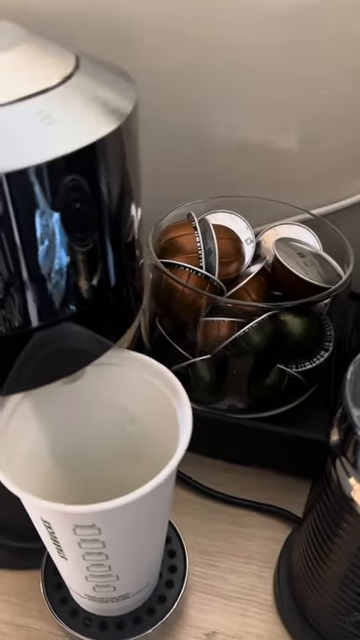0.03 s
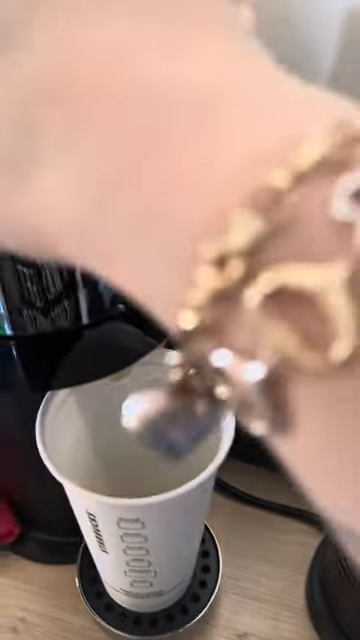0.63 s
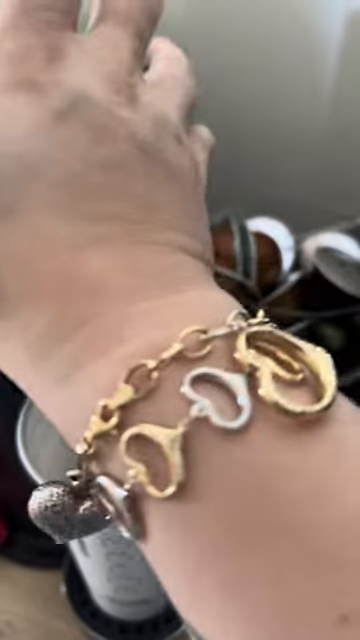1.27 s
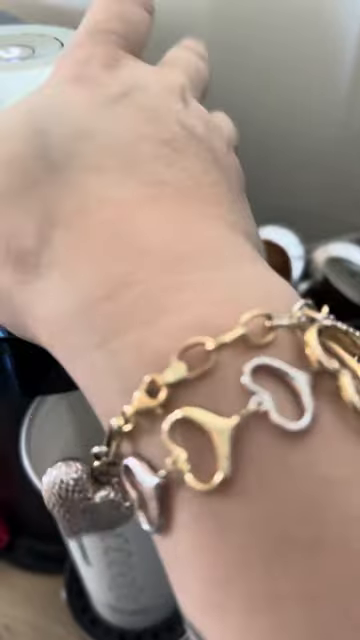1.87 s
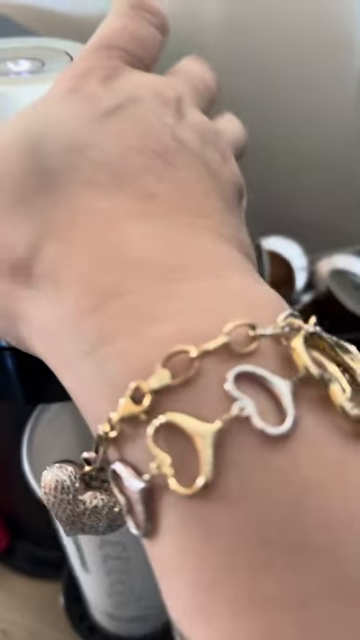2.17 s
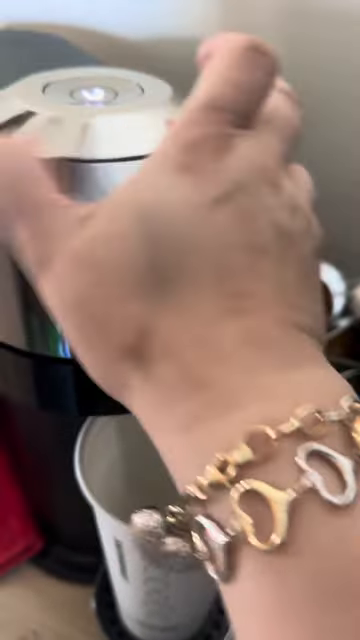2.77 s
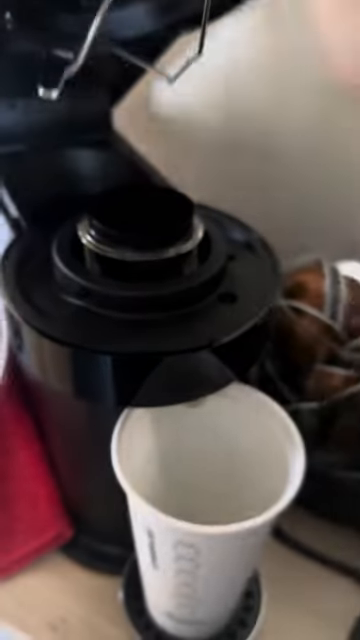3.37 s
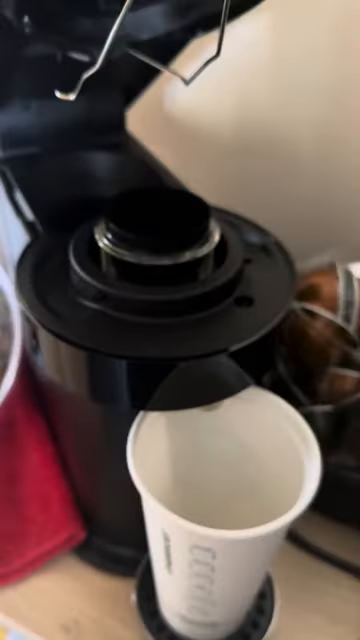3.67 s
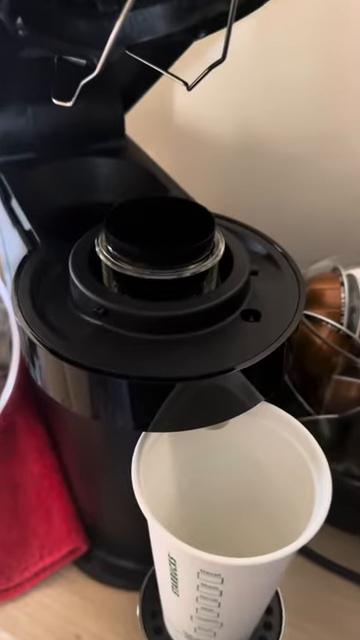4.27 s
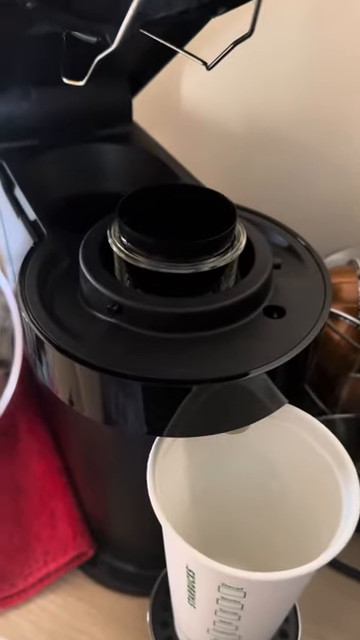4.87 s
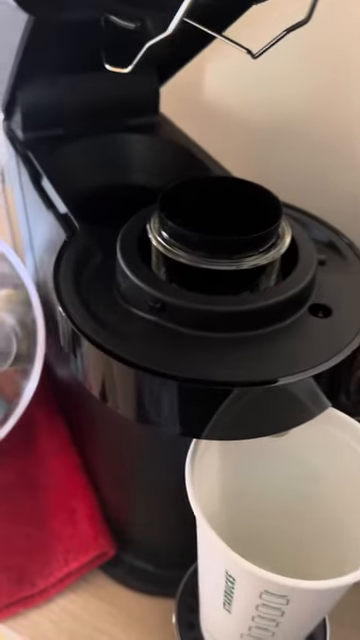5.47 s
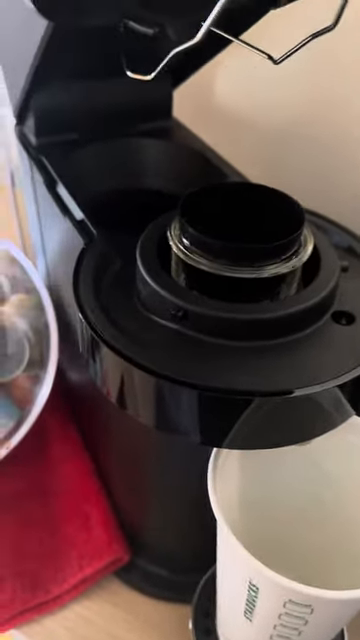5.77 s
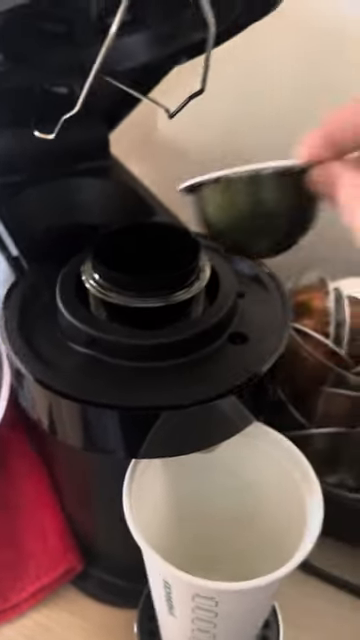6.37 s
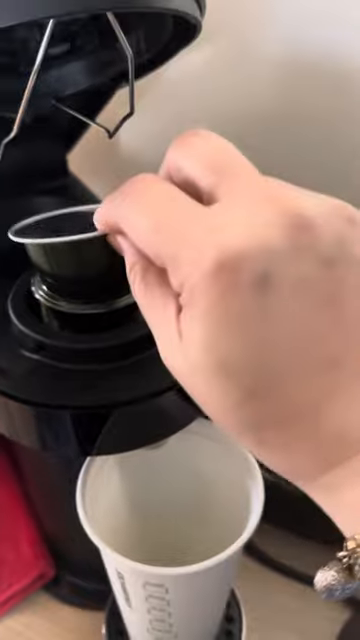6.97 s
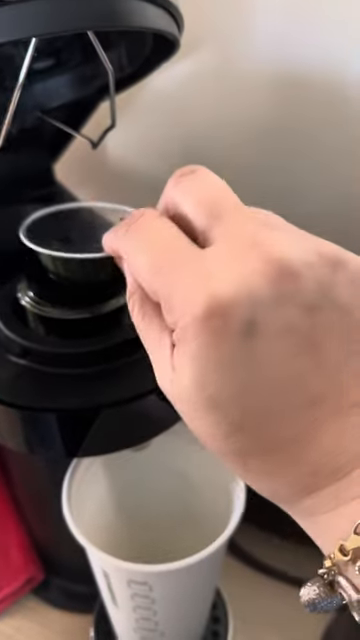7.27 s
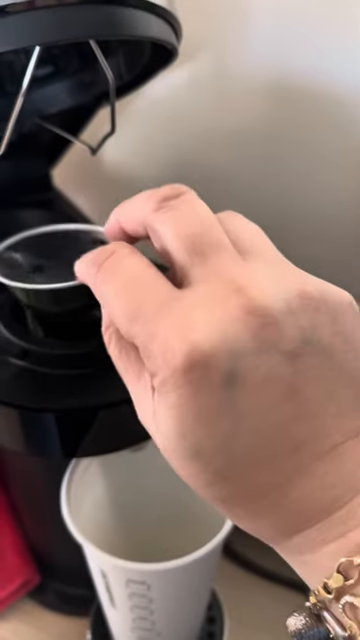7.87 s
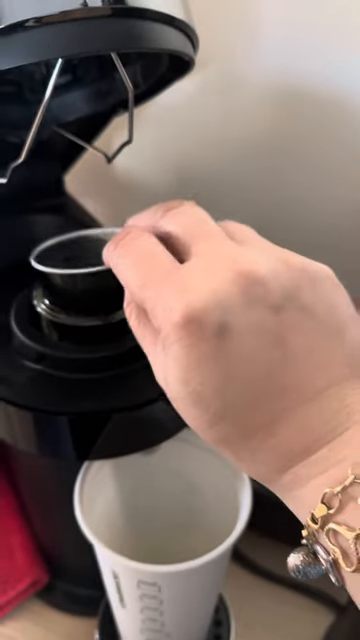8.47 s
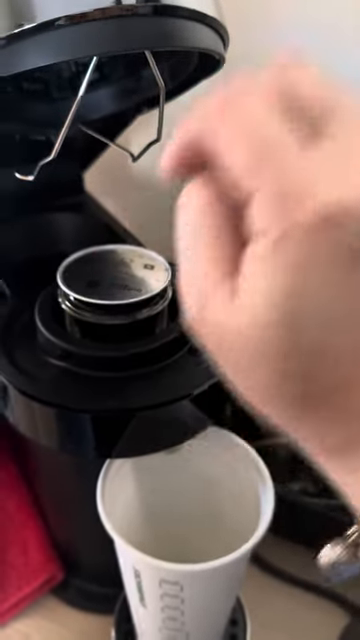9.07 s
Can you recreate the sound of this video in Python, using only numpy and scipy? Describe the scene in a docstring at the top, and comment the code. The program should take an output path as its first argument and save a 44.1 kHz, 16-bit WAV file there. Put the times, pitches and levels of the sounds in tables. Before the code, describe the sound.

A low appliance hum and faint rumble fill a small kitchen, with everything heard close by. From about 0.8 to 2.5 seconds a hand knocks and rubs softly on a coffee machine's housing, with a few tiny metallic bracelet ticks. At 2.7 seconds the latch grinds and releases in a quick cluster of hollow clunks, the loudest moment. A sharp click follows at 3.1 seconds, and the lid rattles against its stop around 3.5. After a lull, from about 4.9 to 6 seconds, fingers rustle and capsules bump lightly in a glass bowl, followed by faint bracelet ticks. At 6.9 seconds an aluminium capsule taps onto the holder and is nudged in short, quiet scrapes, with a longer turn around 8.1. It drops into its seat with a few crisp clicks at about 8.6 seconds, as the hum grows fainter.

```python
"""Loading a capsule coffee machine

A hand with a jingling charm bracelet grips the machine and unlatches the lid, which springs up and
rattles to its stop. A capsule is picked from a glass bowl, set on the holder, scraped round and
dropped into its seat. Knocks are bursts of noise and scrapes are streams of tiny slips; both make
the object ring at its own pitches. It is all heard close by, in a small kitchen with a low hum."""
import sys
import numpy as np
from scipy import signal
from scipy.fft import rfft, irfft
from scipy.io import wavfile
from scipy.ndimage import uniform_filter1d, map_coordinates

SR = 44100
rng = np.random.default_rng(int(sys.argv[2]) if len(sys.argv) > 2 else 0)


def pcm_store(signal):
    """Save signal as 16-bit PCM."""
    levels = np.round(np.clip(np.atleast_2d(signal), -1, 1) * 32767)
    wavfile.write(sys.argv[1], SR, levels.astype(np.int16).T)


N = 401310
BURST_SAMPLES = 16384
# Sounds have two rows: mid (what both ears share) and side (how left and right differ).

# Pitches the machine's housing rings at: pitch_hz, width_hz, boost_db
HOUSING_MODES = [(118, 52, 5.5), (144.6, 15, 13), (295, 50, 12), (426, 38, 9), (506, 32, 12), (564, 28, 11),
                 (852, 31, 10), (1020, 200, 3.8)]
# How wide the machine sounds: pitch_hz, side_db
MACHINE_WIDTH = [(130, -29), (300, -15.5), (480, -8), (640, 7), (860, -1.5), (1900, -4.5), (2900, 4.5),
                 (5500, -5), (10000, 2), (15000, -5.5)]
# Single clunks of the latch and lid: start_s, strength_db, hardness_db
LID_CLUNKS = [(2.694, -39, -6.5), (2.776, -32.5, 1.5), (2.792, -25, -2), (2.806, -23.5, -3.5),
              (2.813, -21.5, -2.5), (2.817, -21, 5), (2.837, -25.5, 1), (2.852, -28.5, 5.5),
              (2.9, -33.5, 0), (2.991, -44, -1), (3.075, -30.5, 10), (3.135, -41, -2.5),
              (3.314, -50.5, 8.5), (3.377, -39.5, -6), (3.385, -48.5, -2), (3.398, -41.5, -1.5),
              (3.63, -56.5, -12)]
# The latch slips, then the lid hits its stop:
# start_s, strength_db, hardness_db, contact_count, first_gap_s, gap_growth, loss_per_contact_db
LID_RATTLES = [(2.701, -33, -2, 3, 0.02, 1.5, 1.5), (3.452, -34, 6.5, 4, .0105, 1.1, -0.1)]
# The latch grinds, the hinge swings, the lid nears the top: start_s, length_s, level_db
HINGE_STROKES = [(2.7, 0.28, -42), (2.93, 0.34, -55.5), (3.04, 0.085, -43.5)]


def lid():
    """The latch grinds over and lets go; the lid flies up and chatters on its stop."""
    contacts = list(LID_CLUNKS) + [contact for row in LID_RATTLES for contact in rattle(*row)]
    clunks = blows(contacts, HOUSING_MODES, MACHINE_WIDTH, low_hz=93, thump_hz=407, body_hz=474,
                   crack_hz=3400, thump_t60=0.13, body_t60=0.081, crack_t60=0.054,
                   thump_db=-1.5, body_db=1.0, crack_db=-6.0)
    grind = rub(strokes(HINGE_STROKES), HOUSING_MODES, MACHINE_WIDTH, low_hz=70, high_hz=2020,
                fizz_hz=3770, fizz_db=-5.5, fizz_power=0.98, uneven_db=4.0, waver_db=3.0)
    return clunks + grind


# Pitches the capsule rings at: pitch_hz, width_hz, boost_db
CAPSULE_MODES = [(309.4, 30, 18.5), (834, 244, 14.5), (988, 85, 22.4), (1530, 94, 8.7), (1757, 87, 16),
                 (2914, 136, 10.5), (3970, 126, 9.4), (5070, 90, 3.5), (7060, 460, 11.5),
                 (9940, 2080, 15.6)]
# How wide the capsules, bracelet and fingers sound: pitch_hz, side_db
SMALL_THINGS_WIDTH = [(320, -12.5), (550, 0.5), (780, 5), (1050, -4), (1800, -7), (2600, 4), (5500, -4.5),
                      (7500, 0), (14000, -2)]
# The capsule taps the holder: start_s, strength_db, hardness_db
CAPSULE_TAPS = [(6.899, -41, -8.5), (8.603, -34, 6), (8.643, -33.5, 1), (8.658, -46.5, 9)]
# Short nudges on the holder: start_s, length_s, level_db
CAPSULE_NUDGES = [(6.916, 0.078, -58), (7.09, 0.12, -65.5), (7.218, 0.083, -62), (7.33, 0.1, -71.5),
                  (7.495, 0.16, -61.5), (7.715, 0.16, -58)]
# The last long turn: time_s, level_db
CAPSULE_TURN = [(7.9, -70), (7.976, -65.5), (8.028, -74), (8.06, -55), (8.136, -57), (8.168, -53),
                (8.274, -61), (8.508, -67), (8.59, -72)]


def capsule():
    """The aluminium capsule lands, is nudged about, scrapes round the holder and drops in."""
    taps = blows(CAPSULE_TAPS, CAPSULE_MODES, SMALL_THINGS_WIDTH, low_hz=88.5, thump_hz=490,
                 body_hz=810, crack_hz=2780, thump_t60=0.11, body_t60=0.03, crack_t60=0.2,
                 thump_db=-6.0, body_db=0.0, crack_db=-26)
    t = np.arange(N) / SR
    turning = (t > CAPSULE_TURN[0][0]) * (t < CAPSULE_TURN[-1][0])
    pressure = strokes(CAPSULE_NUDGES) + level(CAPSULE_TURN, column=1) * turning
    return taps + rub(pressure, CAPSULE_MODES, SMALL_THINGS_WIDTH, low_hz=236, high_hz=3030,
                      fizz_hz=6400, fizz_db=-1.5, fizz_power=1.52, uneven_db=3.0, waver_db=1.5)


# Hand and bracelet knock on the closed machine: start_s, strength_db, hardness_db
HAND_KNOCKS = [(0.779, -53.5, 0.5), (0.92, -44.5, -3.5), (1.087, -54, -7.5), (1.208, -58, -10.5),
               (1.399, -48.5, 4.5), (1.648, -46, 0.5), (1.752, -44.5, -2), (1.777, -46, 6.5),
               (1.81, -42, -14), (2.056, -55.5, -11), (2.383, -54.5, -4), (2.485, -47.5, -15)]
# The hand rubs the housing: start_s, length_s, level_db
GRIP_STROKES = [(0.85, 0.43, -71.5), (1.72, 0.33, -57), (1.95, 0.5, -62)]


def hand():
    """The hand lands on the housing and shifts its grip."""
    knocks = blows(HAND_KNOCKS, HOUSING_MODES, MACHINE_WIDTH, low_hz=99.57, thump_hz=327, body_hz=427,
                   crack_hz=2160, thump_t60=0.17, body_t60=0.15, crack_t60=0.031,
                   thump_db=-3.0, body_db=-5.5, crack_db=-13.0)
    grip = rub(strokes(GRIP_STROKES), HOUSING_MODES, MACHINE_WIDTH, low_hz=270, high_hz=513,
               fizz_hz=2002, fizz_db=-10.5, fizz_power=4.4, uneven_db=2.5, waver_db=2.5)
    return knocks + grip


# Notes left ringing: start_s, pitch_hz, level_db, t60_s (t60 is the time to fade by 60 dB)
RINGING_NOTES = [(1.648, 4790, -50, 0.049), (1.831, 126, -19.5, 0.14), (2.491, 295, -31, 0.22),
                 (3.076, 5090, -26, 0.022), (3.08, 306, -17.5, 0.08), (3.312, 3220, -56, 0.45),
                 (3.377, 1730, -7.5, 0.003), (3.472, 124.4, -24, 0.24), (5.496, 1163, -34, 0.05),
                 (6.051, 5250, -63, 0.13), (8.524, 312, -44.5, 0.078), (8.605, 1106, -27, 0.049)]


def ringing():
    """Housing, wire spring, charms and capsules ring on after a hit, each note a fading pure tone."""
    t, out = np.arange(SR) / SR, np.zeros((2, N))
    for start_s, hz, db, t60 in RINGING_NOTES:
        envelope = amp(db - 60 * t / t60) * (1 - np.exp(-t * hz))
        add(out, start_s, envelope * np.sin(2 * np.pi * hz * t) * np.array([[1], [0]]))  # mid only
    return out


# Pitches the glass bowl rings at: pitch_hz, width_hz, boost_db
BOWL_MODES = [(496, 61, 17.7), (1175, 78, 20), (2580, 330, 7.5)]
# Capsules bump about in the bowl: start_s, strength_db, hardness_db
BOWL_BUMPS = [(4.944, -55, -1), (4.974, -51, 1.5), (5.129, -47, -1), (5.165, -56, 2), (5.181, -54, 4.5),
              (5.316, -62, 5.5), (5.42, -49, -3.5), (5.456, -50, -4), (5.495, -42.5, 3.5),
              (5.677, -55, 1.5), (5.893, -44.5, 3.5)]


def bowl():
    """Fingers push the capsules about in the bowl; each shove ends in small bounces."""
    contacts = []
    for row in BOWL_BUMPS:
        contacts += rattle(*row, count=3, gap_s=0.016 * rng.uniform(.5, 2), growth=1.2, loss_db=9.5)
    return blows(contacts, BOWL_MODES, SMALL_THINGS_WIDTH, low_hz=255, thump_hz=487, body_hz=945,
                 crack_hz=4530, thump_t60=0.033, body_t60=0.016, crack_t60=0.012,
                 thump_db=-4, body_db=-2.5, crack_db=-4.0)


# Pitches the charms ring at: pitch_hz, width_hz, boost_db
CHARM_MODES = [(5410, 96, 21), (7400, 2000, 18.5)]
# The clearest ticks of the links: start_s, level_db
LINK_TICKS = [(0.071, -61), (0.41, -64.5), (0.642, -68), (1.886, -52), (1.948, -71), (1.981, -61),
              (3.357, -62.5), (4.265, -64), (5.82, -60.5), (6.08, -63.5), (6.138, -66), (6.224, -62.5),
              (6.263, -62.5)]
PITCH_SCATTER = 0.016  # ringing pitches differ by about this fraction from hit to hit


def bracelet():
    """Metal links tick together: one clear tick and three weaker neighbours, each at its own pitch."""
    spread_s, loss_db = 0.018, 10.5
    out = np.zeros((2, N))
    for start_s, db in LINK_TICKS:
        for link, (wait, shift) in enumerate(rng.standard_normal((4, 2))):
            neighbour = link > 0
            modes = [(hz * (1 + PITCH_SCATTER * shift), wide, boost) for hz, wide, boost in CHARM_MODES]
            colour = response(modes, SMALL_THINGS_WIDTH, low_hz=3400, high_hz=SR)
            tick = burst(db - neighbour * loss_db, colour, rise_s=0.00036, t60=0.0095)
            add(out, start_s + neighbour * spread_s * wait, tick)
    return out


# The one dull note of a surface under the fingers: pitch_hz, width_hz, boost_db
MUFFLED_MODES = [(455, 73, 8.5)]
# Fingers brush and rummage: start_s, length_s, level_db
FINGER_STROKES = [(0.82, 0.4, -74), (4.9, 0.46, -68), (5.27, 0.4, -63.5), (5.62, 0.44, -66.5)]


def fingers():
    """Skin rustles over smooth surfaces, muffling their ring."""
    return rub(strokes(FINGER_STROKES), MUFFLED_MODES, SMALL_THINGS_WIDTH, low_hz=336, high_hz=3670,
               fizz_hz=4860, fizz_db=-4.0, fizz_power=1.38, uneven_db=3.5, waver_db=5)


# How long the room's echo lasts: pitch_hz, t60_s
ECHO_TIMES = [(100, 0.29), (3000, 0.28), (14000, 0.08)]


def kitchen(sound):
    """The room sends back about 3000 small echoes a second; the highest pitches die first."""
    echoes = rng.choice([-1., 1.], (2, SR // 2)) * (rng.random((2, SR // 2)) < 3000 / SR)
    echoes[:, :round(.005 * SR)] = 0  # the first echo needs time to come back
    hz, t, bands = signal.stft(echoes, SR, nperseg=256)
    fade = amp(-60 * t / at_pitch(ECHO_TIMES, hz)[:, None])
    tail = signal.istft(bands * fade, SR, nperseg=256)[1]
    return signal.fftconvolve(sound, tail / np.linalg.norm(tail[0]), axes=1)[:, :N]


# The background swells and fades while the hum drifts: time_s, rumble_db, hum_db, hum_pitch_hz
BACKGROUND_CURVE = [(0.301, -62, -63.5, 74.17), (2.3, -59, -62, 71.17), (3.95, -61, -63.5, 73.07),
                    (4.7, -66.5, -70.5, 75.7), (7.1, -65, -76.5, 79.56), (8.6, -71, -81.5, 79.8)]
# The hum's tones, at 1, 2, 3... times its pitch: relative_db
HUM_TONES = [6.5, -1, -18, -12.5, -6.5]
# Tone colour of the low rumble: pitch_hz, relative_db
RUMBLE_COLOUR = [(22, -32), (50, 5.5), (90, -3.5), (220, -19), (370, -19), (500, -31.5), (3000, -66)]
# Tone colour of the hiss: pitch_hz, relative_db
HISS_COLOUR = [(700, -3), (3000, 2), (4500, -5.5), (9500, -9), (12000, -31)]


def background():
    """An appliance hums, each tone swelling and fading on its own, over low rumble and faint hiss."""
    t, rows = np.arange(N) / SR, np.array(BACKGROUND_CURVE)
    pitch_hz = np.interp(t, rows[:, 0], rows[:, -1]) + .5 * drift(t, 5.5)
    cycles = np.cumsum(pitch_hz) / SR
    tones = sum(amp(db + 5.7 * drift(t, 8.7)) * np.sin(2 * np.pi * k * cycles)
                for k, db in enumerate(HUM_TONES, 1))
    hum = tones * level(BACKGROUND_CURVE, column=2) * np.array([[1], [.1]])  # mostly mid
    rumble = level(BACKGROUND_CURVE, column=1) * air_noise(RUMBLE_COLOUR, patchy_db=2.5)
    hiss = amp(-78.5) * air_noise(HISS_COLOUR, patchy_db=4.5)
    return hum + rumble + hiss


# How wide the rumble and hiss sound: pitch_hz, side_db
NOISE_WIDTH = [(70, -12.5), (350, 0), (600, 8), (6000, -4.5), (12000, 9.5)]


def air_noise(colour, patchy_db):
    """Steady noise with soft, drifting patches that are a little louder or quieter."""
    frames, hz = N // 256 + 5, np.fft.rfftfreq(1024, 1 / SR)
    real, imag = rng.standard_normal((2, 2, frames, 513))
    patches = uniform_filter1d(rng.standard_normal((frames, 513)), size=26, axis=0)  # smooth in time
    patches = unit_rms(uniform_filter1d(patches, size=22, axis=1))  # and in pitch
    bands = (real + 1j * imag) * amp(at_pitch(colour, hz) + patchy_db * patches)
    bands[1] *= amp(at_pitch(NOISE_WIDTH, hz))
    return unit_rms(signal.istft(bands.transpose(0, 2, 1), nperseg=1024, noverlap=768)[1][:, :N])


def blows(rows, modes, width, low_hz, thump_hz, body_hz, crack_hz,
          thump_t60, body_t60, crack_t60, thump_db, body_db, crack_db):
    """Each hit thumps, knocks and cracks as the counter booms; a hard one trades thump for crack."""
    out = np.zeros((2, N))
    for start_s, strength, hardness in rows:
        # Each spot that is hit rings a little differently.
        shifts, lifts = rng.standard_normal((2, len(modes)))
        struck = [(hz * (1 + PITCH_SCATTER * shift), wide, db + 2.5 * lift)
                  for (hz, wide, db), shift, lift in zip(modes, shifts, lifts)]
        low_db, high_db = strength + thump_db - hardness, strength + crack_db + hardness
        boom = burst(low_db - 11.5, response(struck, width, 51, 51), rise_s=0.0074, t60=0.44)
        thump = burst(low_db, response(struck, width, low_hz, thump_hz), 0.013, thump_t60)
        knock = burst(strength + body_db, response(struck, width, body_hz, crack_hz), 0.0013, body_t60)
        crack = burst(high_db, response(struck, width, crack_hz, 7900), 0.00067, crack_t60)
        add(out, start_s, boom + thump + knock + crack)
    return out


def burst(db, colour, rise_s, t60):
    """One contact: clumpy noise swells, dies away and rings through the object."""
    t = np.arange(BURST_SAMPLES) / SR
    envelope = (1 - np.exp(-t / rise_s)) * amp(-60 * t / t60)
    chatter = amp(4.5 * drift(t, 600)) * rng.standard_normal((2, BURST_SAMPLES))
    sound = irfft(rfft(envelope * chatter) * colour)
    return amp(db) * sound / np.sqrt(np.sum(sound ** 2) / (.02 * SR))  # level as if it lasted 20 ms


def rattle(start_s, strength_db, hardness_db, count, gap_s, growth, loss_db):
    """A run of bounces; each gap is growth times the last, and each bounce loses loss_db."""
    gaps = gap_s * growth ** np.arange(round(count))
    waits = np.cumsum(gaps) - gaps
    return [(start_s + wait, strength_db - loss_db * n, hardness_db) for n, wait in enumerate(waits)]


def rub(pressure, modes, width, low_hz, high_hz, fizz_hz, fizz_db, fizz_power, uneven_db, waver_db):
    """Tiny uneven slips make the object ring; its edge adds a high fizz that follows the pressure."""
    slips_per_s = 4800
    first, last = np.flatnonzero(pressure)[[0, -1]]
    t, press, out = np.arange(first, last) / SR, pressure[first:last], np.zeros((2, N))
    sizes = amp(uneven_db * np.minimum(rng.exponential(1, N), 4))
    sizes *= rng.random(N) < slips_per_s / SR
    slips = amp(waver_db * drift(t, 41)) * (sizes * rng.standard_normal((2, N)))[:, first:last]
    fizz = amp(fizz_db) * press.max() * (press / press.max()) ** fizz_power
    # As the touching point moves, the pitch wanders and the tone blends between two spots.
    position = np.cumsum(1 + .015 * drift(t, 9))
    blend = np.sin(drift(t, 9)) ** 2
    for gain, edges in ((press, (low_hz, high_hz)), (fizz, (fizz_hz, 13000))):
        sound = sum(signal.fftconvolve(share * slips, irfft(response(modes, width, *edges)), axes=1)
                    for share in (blend, 1 - blend))
        bent = [map_coordinates(part[:len(t)], [position], order=3, mode="mirror") for part in sound]
        add(out, t[0], gain * unit_rms(np.array(bent)))
    return out


def strokes(rows):
    """Pressure over time: each stroke swells and eases in one arch."""
    pressure = np.zeros((1, N))
    for start_s, length_s, db in rows:
        arch = np.sin(np.linspace(0, np.pi, max(round(length_s * SR), 2)))
        add(pressure, start_s, amp(db) * np.abs(arch[None]) ** 0.8)
    return pressure[0]


def response(modes, width, low_hz, high_hz):
    """How an object colours a sound: it boosts its modes, the pitches it likes to ring at."""
    hz = np.fft.rfftfreq(BURST_SAMPLES, 1 / SR)
    power = 1 + sum(amp(db) ** 2 / (1 + ((hz ** 2 - pitch ** 2) / (wide * (hz + 1))) ** 2)
                    for pitch, wide, db in modes)
    ripple = amp(3.5 * drift(hz, 1 / 139.8))  # countless minor modes, about 140 Hz apart
    colour = np.sqrt(power) * band(hz, low_hz, high_hz) * ripple
    # The mid drops out above 9880 Hz, so the highest treble is mostly side.
    mid = band(hz, 0, 9880, order=20) + amp(-9) * band(hz, 16000, SR, order=20)
    gain = colour * np.array([mid, amp(at_pitch(width, hz))])
    # Minimum phase: the ringing comes after the hit, never before it.
    cepstrum = irfft(np.log(gain / gain.max() + 1e-5))
    cepstrum[:, 1:BURST_SAMPLES // 2] *= 2
    cepstrum[:, BURST_SAMPLES // 2 + 1:] = 0
    return np.exp(rfft(cepstrum))


def band(hz, low_hz, high_hz, order=3):
    """Gain that lets a range of pitches through and fades smoothly outside it."""
    return 1 / np.sqrt((1 + (low_hz / (hz + 1)) ** (2 * order)) * (1 + (hz / high_hz) ** (2 * order)))


def drift(t, rate):
    """A random wobble that heads for a new value rate times per unit of t."""
    return np.interp(t * rate, np.arange(BURST_SAMPLES), rng.standard_normal(BURST_SAMPLES))


def amp(db):
    """Turns decibels into gain."""
    return 10 ** (np.asarray(db) / 20)


def unit_rms(sound):
    """Scales a sound to an average power of one."""
    return sound / np.sqrt(np.mean(sound ** 2) + 1e-30)


def at_pitch(points, hz):
    """Looks up a table of pitch_hz, value, gliding between its rows."""
    pitches, values = np.transpose(points)
    return np.interp(np.log(hz + 1), np.log(pitches + 1), values)


def level(rows, column):
    """Gain over time from one decibel column of a table."""
    rows = np.array(rows)
    return amp(np.interp(np.arange(N) / SR, rows[:, 0], rows[:, column]))


def add(mix, start_s, sound):
    """Adds a sound to the mix at start_s."""
    part = mix[:, max(round(start_s * SR), 0):][:, :sound.shape[1]]
    part += sound[:, :part.shape[1]]


def scene():
    """Mixes the sources with the room's echo, then turns mid and side into left and right."""
    machine = hand() + lid()
    small_things = bowl() + fingers() + bracelet()
    holder = capsule()
    echo = kitchen(amp(-12.0) * machine + amp(-9.5) * small_things + amp(-13.5) * holder)
    mid, side = machine + ringing() + small_things + holder + echo + background()
    return np.array([mid + side, mid - side])


def record(dry):
    """Trims away the deepest rumble and the very highest treble."""
    low_cut_hz, high_cut_hz = 36, 16000
    trimmed = signal.sosfilt(signal.butter(4, low_cut_hz, "high", fs=SR, output="sos"), dry)
    treble_cut = signal.firwin(511, high_cut_hz, window=("kaiser", 9), fs=SR)
    return signal.oaconvolve(trimmed, treble_cut[None], "same")


dry = scene()
out = record(dry)
pcm_store(out)
```